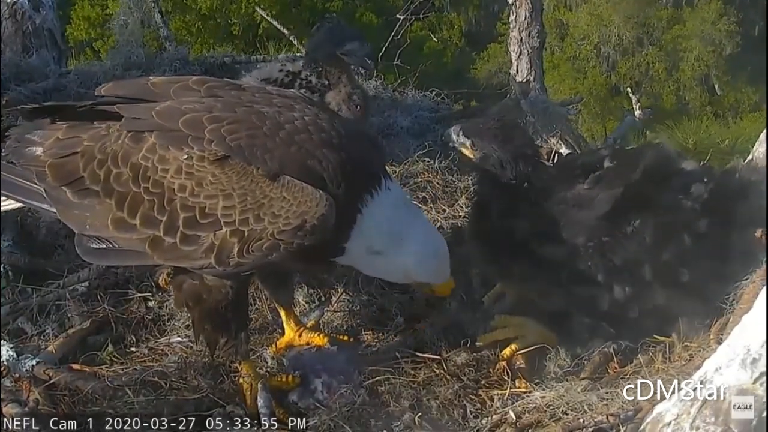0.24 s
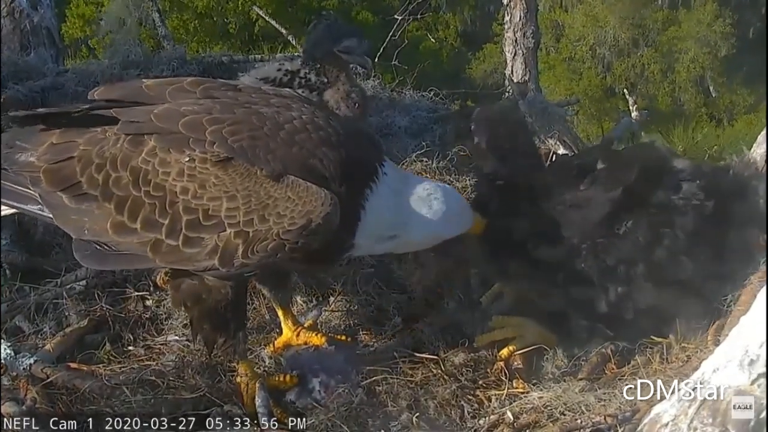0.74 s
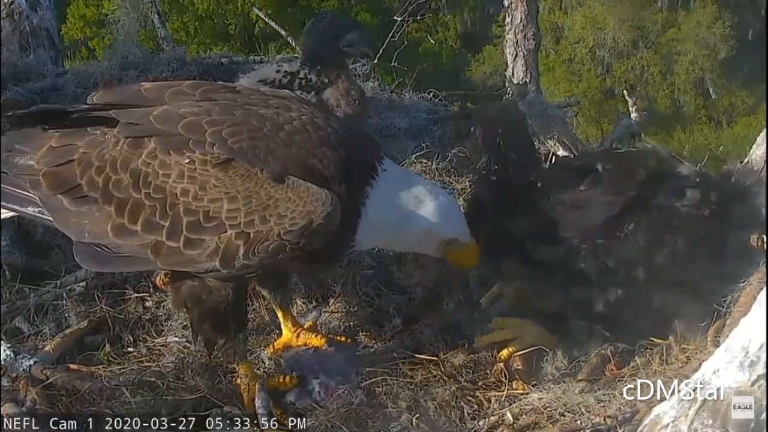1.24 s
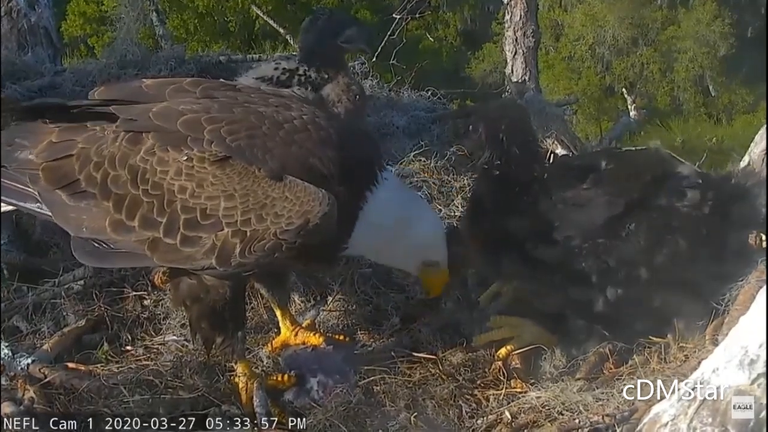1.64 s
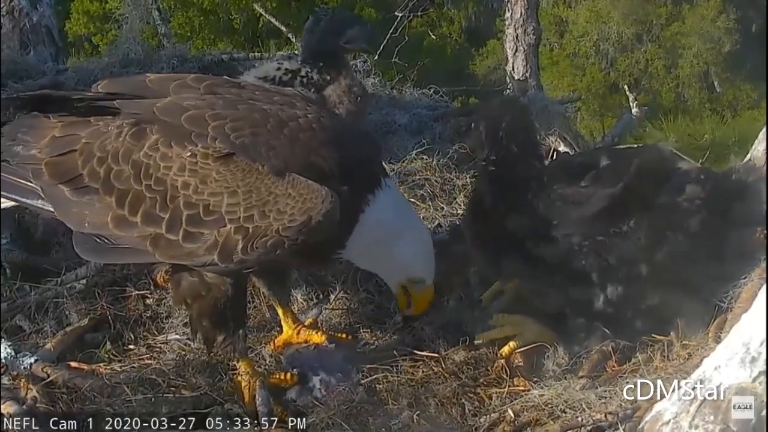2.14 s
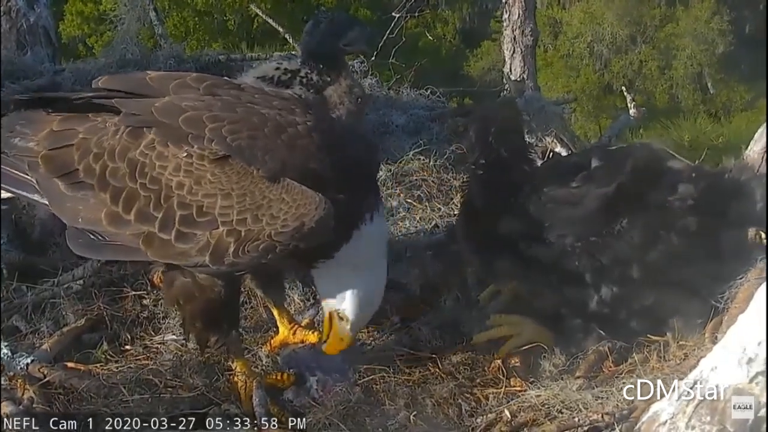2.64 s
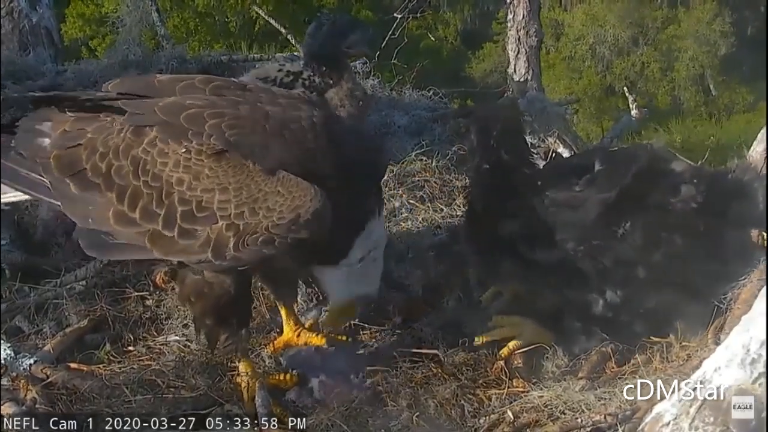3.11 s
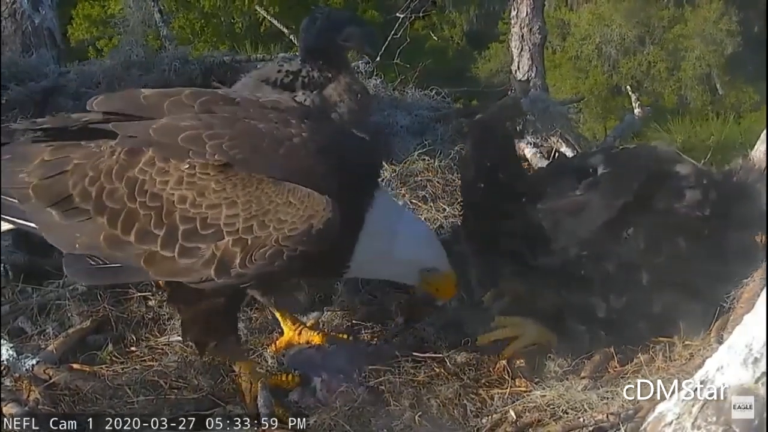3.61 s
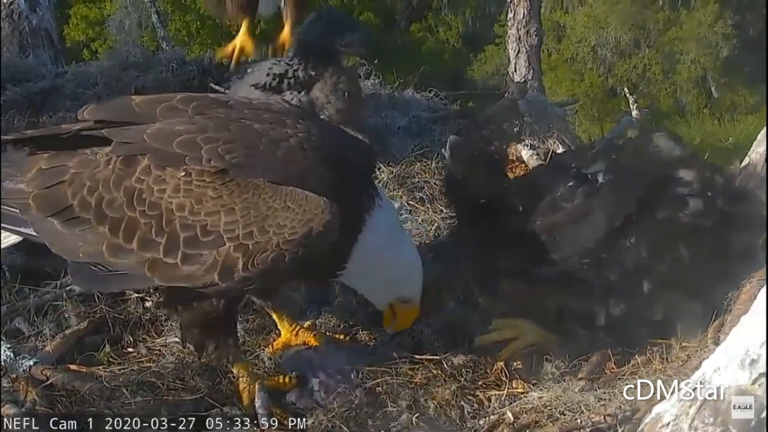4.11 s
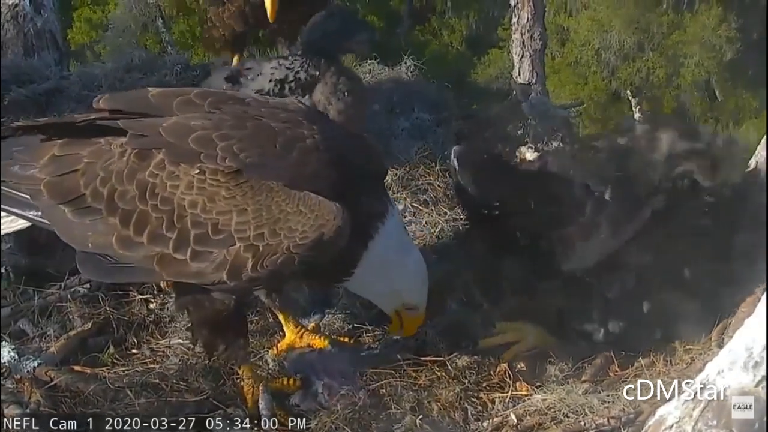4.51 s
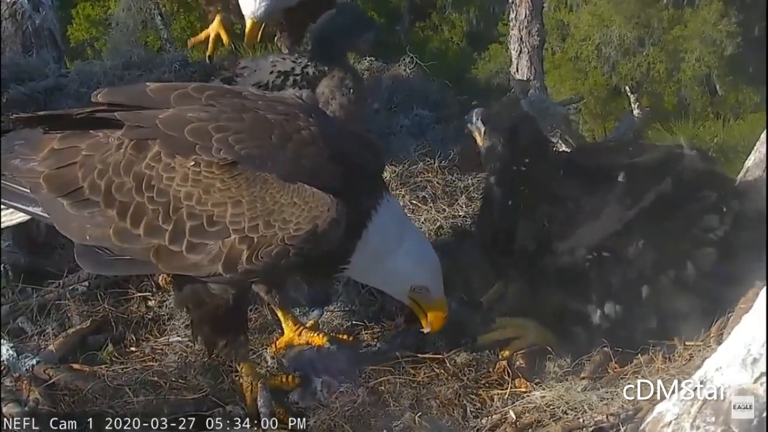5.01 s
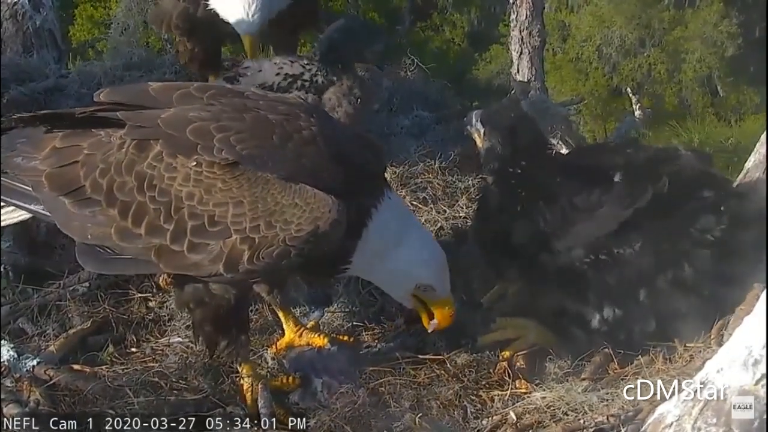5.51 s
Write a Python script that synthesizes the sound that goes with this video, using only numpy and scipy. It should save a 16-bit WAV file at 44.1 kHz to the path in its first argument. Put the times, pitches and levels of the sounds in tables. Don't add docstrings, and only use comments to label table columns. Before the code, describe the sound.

An eagle close by gives loud, piercing, wavering thin whistles that turn hoarse, then soft chirps, while another answers faintly over leaf hiss and wind.

```python
import sys
import numpy as np
from scipy import signal
from scipy.fft import rfft, irfft, next_fast_len
from scipy.io import wavfile
from scipy.ndimage import uniform_filter1d

SR = 44100
rng = np.random.default_rng(int(sys.argv[2]) if len(sys.argv) > 2 else 0)


def gain_from_db(level_db):
    decades = np.asarray(level_db, float) / 20
    return 10 ** decades


def wrap_up_sound(samples):
    columns = np.atleast_2d(samples).T
    tamed = np.clip(columns, -1, 1)
    steps = np.round(tamed * 32767).astype(np.int16)
    wavfile.write(sys.argv[1], SR, steps)


N = 253553
T = np.arange(N) / SR

# time in seconds, pitch in Hz, level in dB.
NEAR_PHRASES = [
    [(0.0, 3211, -21), (0.226, 3255, -22), (0.28, 3177, -20.5), (0.29, 2787, -20), (0.3, 2808, -35)],
    [(0.308, 2659, -20.5), (0.314, 2576, -14), (0.322, 2460, -16.5), (0.348, 2411, -32.5),
     (0.36, 2620, -46)],
    [(1.17, 3355, -31.5), (1.274, 3418, -21.5), (1.31, 3393, -29.5), (1.352, 3443, -23),
     (1.488, 3430, -24.5)],
]
# time in seconds, pitch in Hz, level in dB.
SOFT_PHRASES = [
    [(2.97, 3440, -48), (2.998, 3596, -38), (3.016, 3160, -36), (3.068, 2830, -38), (3.09, 2796, -42),
     (3.1, 3017, -66)],
    [(4.95, 2938, -40), (4.964, 2762, -34.5), (5.066, 2789, -40), (5.092, 2906, -33), (5.17, 2891, -33),
     (5.2, 2823, -45)],
    [(5.2, 2797, -48.5), (5.212, 2970, -41.5), (5.282, 2886, -33.5), (5.314, 2923, -38), (5.34, 2990, -37),
     (5.4, 2900, -39)],
    [(5.41, 2833, -34), (5.418, 2587, -28), (5.426, 2580, -24), (5.432, 2430, -38), (5.44, 2180, -43)],
]
# time in seconds, pitch in Hz, level in dB.
HUSKY_PHRASES = [
    [(0.71, 2513, -59), (0.726, 3098, -31), (0.76, 3496, -30), (0.846, 2934, -30), (0.91, 3040, -31),
     (0.944, 3032, -34), (1.022, 3280, -20), (1.034, 3318, -30), (1.17, 3340, -29.5)],
]
# trough in seconds, trough pitch in Hz, crest in seconds, crest pitch in Hz, level in dB.
HOARSE_SYLLABLES = [(1.745, 3450, 1.775, 3660, -23.5), (1.825, 3110, 1.895, 3550, -21.5),
                    (1.975, 3250, 2.045, 3490, -22), (2.088, 3110, 2.155, 3360, -23),
                    (2.19, 3270, 2.225, 3300, -20.5), (2.285, 3090, 2.34, 3370, -22.5),
                    (2.36, 3330, 2.39, 3385, -21.5), (2.418, 3170, 2.465, 3350, -27),
                    (2.5, 3290, 2.535, 3500, -28)]
# trough in seconds, trough pitch in Hz,
# crest in seconds, crest pitch in Hz, level in dB.
WAVER_SYLLABLES = [(3.105, 2870, 3.165, 2990, -35), (3.3, 2840, 3.375, 3020, -33),
                   (3.447, 2830, 3.52, 2940, -32), (3.6, 2865, 3.68, 2920, -34),
                   (3.73, 2740, 3.8, 2800, -38), (3.846, 2790, 3.866, 2610, -31)]
# trough in seconds, trough pitch in Hz,
# crest in seconds, crest pitch in Hz, level in dB.
REPLY_SYLLABLES = [(3.325, 3790, 3.38, 3960, -43), (3.46, 3790, 3.54, 3900, -43),
                   (3.605, 3820, 3.66, 3940, -45)]
# start in seconds, length in seconds, crest pitch in Hz, arch in Hz, level in dB.
CHIRPS = [(4.09, 0.1, 3180, 380, -31.5), (4.25, .11, 2990, 380, -30), (4.4, 0.11, 2920, 420, -35),
          (4.74, .115, 2936, 420, -35), (4.875, .1, 2884, 329.5, -34.5)]
# start in seconds, length in seconds, pitch in Hz, sag in Hz, level in dB.
FAR_NOTES = [(1.41, .09, 4010, 29.5, -42), (2.63, .08, 3850, -21, -38.5), (2.71, .07, 3830, 81, -41.5),
             (4.275, .065, 4050, 29.5, -45), (4.435, .07, 3990, 40, -44.5), (4.52, 0.11, 3960, 1.5, -51.5),
             (5.575, .065, 4130, 25, -44.5), (5.645, .1, 3940, 99, -53)]
# start in seconds, length in seconds, pitch in Hz, sag in Hz, level in dB.
UNDER_NOTES = [(1.21, 0.094, 3080, 0.5, -39), (1.33, 0.22, 3094, 0.5, -36), (1.8, 0.065, 3015, -1.5, -35.5),
               (1.97, .07, 3063, -1.5, -30), (2.17, .1, 2980, 59.5, -36.5), (2.33, .13, 2954, -0.5, -35.5)]
# start in seconds, peak in dB.
PUSHES = [(0.079, -10.5), (.1114, -13), (0.2125, -7.5), (.262, -17), (.3107, -12), (.4444, -27),
          (0.781, -20), (.962, -15), (1.0071, -13), (1.2452, -12.5), (1.3507, -14.5), (1.481, -16.5),
          (2.178, -14), (1.94, -16.5), (1.8192, -19), (1.8623, -9.5), (1.974, -15.5), (2.0272, -12.5),
          (2.052, -9.5), (2.095, -11), (2.2247, -15), (2.367, -14), (2.4816, -17), (3.3266, -25),
          (3.489, -21.5), (3.6172, -23.5), (3.8493, -19), (4.7569, -22.5), (5.2615, -22), (5.376, -21),
          (5.391, -23), (5.418, -22)]
# time in seconds, depth in dB.
CATCHES = [(1.305, -8.5), (1.462, -9), (1.848, -9.5), (1.955, -5), (3.21, -7), (3.322, -8), (3.35, -5),
           (3.452, -13), (3.6, -4), (3.843, -13), (4.125, -4), (4.435, -7), (4.752, -8), (5.368, -8),
           (5.408, -11)]
OVERTONES_DB = [-45.5, -45.5, -48]
# frequency in Hz, density in dB per Hz.
BREATH = [(1500, -39), (2200, -22.5), (2600, -7), (3200, 1), (3900, -5.5), (4400, -18), (6000, -55)]
# start in seconds, length in seconds, pitch in Hz, fall as a share of pitch, level in dB.
GULPS = [
    (.308, 0.069, 1306, .1, -29),
    (1.489, 0.013, 1440, 0.12, -26),
    (1.502, 0.03, 1986, 0.055, -26),
    (1.516, 0.029, 1895, .07, -28),
    (1.519, 0.059, 1152, 0.047, -40),
    (2.361, 0.11, 313, .033, -56),
    (3.904, 0.027, 1170, 0.085, -37),
    (5.428, 0.039, 1182, .03, -31.5),
]
# frequency in Hz, gain in dB.
THROAT = [(316, 0.5), (630, -11), (1150, -23.5), (2000, -5), (2900, 7), (3900, -6.5), (4400, -9),
          (6000, -25)]
# start in seconds, length in seconds, level in dB.
RUSTLES = [(9.3, .025, -46), (5.02, 0.063, -50.5), (3.47, 0.039, -58)]
# frequency in Hz, density in dB per Hz.
LEAVES = [(120, -55), (200, -32), (281, -28), (440, -28), (499, -24.5), (1850, -14), (2130, -12.5),
          (2600, 0.5), (2790, -1.5), (3930, -8), (5520, -26.5), (13100, -46), (14600, -60)]
# centre in seconds, half width in seconds, level in dB over the breeze.
GUSTS = [(.07, .03, 3.5), (.29, 0.1, 13.5), (.7, .06, 8.5), (1.02, 0.11, 6.5), (1.36, 0.082, 6),
         (1.699, 0.077, -9.5), (1.88, 0.14, 7), (2.149, .15, 1.5), (2.53, .05, 7.5), (2.801, 0.2, -12),
         (3.461, 0.078, 11), (4.1, .25, 0.5), (4.63, 0.12, -14), (4.8, 0.019, 11), (5.02, 0.067, 13),
         (5.421, 0.06, 10.5), (5.75, .1, -10)]
# frame number, level in dB over the 1-2 kHz hiss that a band needs to survive.
STARVED = [(6, 7), (14, 3), (26, 2), (32, 1), (35, 3), (36, 6), (45, 1), (49, 1), (52, 6), (103, 8),
           (109, 7), (112, 4), (113, 7), (119, 1), (123, 2), (126, 3), (127, 3), (134, 0), (138, -1),
           (150, 5), (155, 2), (170, 0), (174, 4), (185, 4), (197, 2), (234, 3), (245, 1), (249, 2),
           (252, 3), (254, 4)]


def near_bird():
    push = pushes(rise_s=0.008, fall_s=0.014, trim_db=-4.5)
    hoarse = warble(HOARSE_SYLLABLES, end=(2.59, 2650, -32.5))
    waver = warble(WAVER_SYLLABLES, end=(3.9, 2580, -34.5))
    soft = SOFT_PHRASES[:1] + waver + SOFT_PHRASES[1:]
    voice = whistle(NEAR_PHRASES, push, flutter_db=1.6, rasp=0.27, rasp_rate=450,
                    side_hz=470, side_db=-19, jitter=0.004, breath_db=-16)
    voice += whistle(HUSKY_PHRASES, push, flutter_db=1.6, rasp=0.28, rasp_rate=500,
                     side_hz=190, side_db=-12, jitter=0.006, breath_db=-14)
    voice += whistle(hoarse, push, flutter_db=1.7, rasp=0.36, rasp_rate=750,
                     side_hz=330, side_db=-10, jitter=0.01, breath_db=-12)
    voice += whistle(soft, push, flutter_db=2.6, rasp=0.18, rasp_rate=450,
                     side_hz=200, side_db=-17, jitter=0.005, breath_db=-18)
    voice += whistle(held(UNDER_NOTES), 0, flutter_db=5.0, rasp=0.08, rasp_rate=700,
                     side_hz=202, side_db=-18, jitter=0.0043, breath_db=-25.5)
    voice += whistle(chirps(CHIRPS), push, flutter_db=3, rasp=0.3, rasp_rate=450,
                     side_hz=70, side_db=-7, jitter=0.005, breath_db=-18)
    return voice


def far_bird():
    notes = held(FAR_NOTES)
    reply = warble(REPLY_SYLLABLES, end=(3.8, 3770, -54))
    return whistle(notes[:3] + reply + notes[3:], 0, flutter_db=2.2, rasp=0.18, rasp_rate=400,
                   side_hz=200, side_db=-21, jitter=0.005, breath_db=-22)


def whistle(phrases, push, flutter_db, rasp, rasp_rate, side_hz, side_db, jitter, breath_db):
    hz, gain = played(phrases)
    sounding = np.clip(gain / gain_from_db(-60.0), 0, 1)
    gain = np.maximum(gain * gain_from_db(flutter_db * walk(70)), push * sounding)
    phase = 2 * np.pi * np.cumsum(hz * (1 + jitter * walk(90.2))) / SR
    twin_phase = 2 * np.pi * np.cumsum(side_hz * (1 + 0.13 * walk(12))) / SR
    twin = gain_from_db(side_db + 8.0 * walk(11)) * np.sin(twin_phase)
    shake = 1 + twin + rasp * (walk(rasp_rate) + 1j * walk(rasp_rate))
    size = np.sqrt(2) * gain * abs(shake) / np.sqrt(np.mean(abs(shake) ** 2))
    phase = phase + np.angle(shake)
    grain = 0.32 * walk(700)
    full_effort_db = -20
    effort = (size / gain_from_db(full_effort_db)) ** 0.29
    overtones = sum(gain_from_db(db) * np.sin((k + 2) * (phase + grain)) for k, db in enumerate(OVERTONES_DB))
    breath = gain * gain_from_db(breath_db) * colour(BREATH)
    return size * (np.sin(phase) + effort * overtones) + breath


def played(phrases):
    hz = np.interp(T, *np.concatenate(phrases)[:, :2].T)
    gain = np.zeros(N)
    for s, _, db in map(np.transpose, phrases):
        on = (T >= s[0]) & (T <= s[-1])
        gain[on] = gain_from_db(np.interp(T[on], s, db))
    return uniform_filter1d(hz, 150), uniform_filter1d(gain, 200)


def warble(rows, end):
    trough_db = -4.5
    turns = []
    for s, hz, top_s, top_hz, db in rows:
        turns += [(s, hz, db + trough_db), (top_s, top_hz, db)]
    turns = np.array(turns + [end])
    ease = np.linspace(0, 1, num=8, endpoint=False)[:, None]
    swing = (1 - np.cos(np.pi * ease)) / 2
    shape = np.hstack([ease, swing, swing])
    return [np.concatenate([a + (b - a) * shape for a, b in zip(turns, turns[1:])] + [turns[-1:]])]


def chirps(rows):
    u = np.linspace(-1, 1, num=15)
    edge_db = -13
    return [np.transpose([s + length * (u + 1) / 2, hz - arch_hz * u ** 2, db + edge_db * u ** 2])
            for s, length, hz, arch_hz, db in rows]


def held(rows):
    fade_s, edge_db, tire_db = 0.015, -3.5, -3
    return [[(s, hz, db + edge_db),
             (s + fade_s, hz, db),
             (s + length - fade_s, hz - sag_hz, db + tire_db),
             (s + length, hz - sag_hz, db + tire_db + edge_db)] for s, length, hz, sag_hz, db in rows]


def pushes(rise_s, fall_s, trim_db):
    out = np.zeros(N)
    for s, db in PUSHES:
        span = slice(int(s * SR), int((s + 0.06) * SR))
        u = T[span] - s
        rise = np.sin(np.pi / 2 * np.clip(u / rise_s, 0, 1))
        swell = gain_from_db(db + trim_db) * rise * np.exp(-(u / fall_s) ** 2)
        out[span] = np.maximum(out[span], swell)
    return out


def catches():
    width_s = 0.0056
    return gain_from_db(sum(db * np.exp(-((T - s) / width_s) ** 2) for s, db in CATCHES))


def gulps():
    out = np.zeros(N)
    rasp = 1 + 0.55 * walk(350)
    throat_hz, throat_db = np.transpose(THROAT)
    for s, length, hz, fall, db in GULPS:
        u = np.clip((T - s) / length, 0, 1)
        phase = 2 * np.pi * hz * length * (u - fall * u ** 2 / 2)
        swell = np.sin(np.pi * u ** 0.37)
        for k in range(1, 4):
            partial_db = db + np.interp(np.log(k * hz), np.log(throat_hz), throat_db)
            out += swell * gain_from_db(partial_db) * np.sin(k * phase)
    return np.sqrt(2) * out * rasp


def wood(x):
    t60_s, tail_db, slap_s, slap_db = 1, -15, 0.125, -18
    t = T[:SR]
    tail = rng.standard_normal(SR) * np.exp(-np.log(1000) * t / t60_s) * np.clip(t / 0.033, 0, 1)
    tail = gain_from_db(tail_db) * tail / np.sqrt(np.sum(tail ** 2))
    tail[int(slap_s * SR)] += gain_from_db(slap_db)
    tail = signal.sosfilt(signal.butter(2, [2000, 5000], "band", fs=SR, output="sos"), tail)
    sway = (1 + 1.6 * walk(260)) / 1.89
    return signal.fftconvolve(x * sway, tail)[:N]


def rustles():
    swell = sum(gain_from_db(db) * np.sin(np.pi * np.clip((T - s) / length, 0, 1)) for s, length, db in RUSTLES)
    twigs = colour([(100, -12), (300, -1), (800, -6.5), (1500, -11.0), (2500, -25)])
    return swell * gain_from_db(3.6 * walk(150)) * twigs


def leaves():
    return gain_from_db(-41.5 + 0.5 * walk(6)) * colour(LEAVES)


def wind():
    calm_db, rumble_db, rumble_slope = -56, -7, 0.79
    gust_db = sum(db * np.exp(-((T - s) / half_s) ** 2) for s, half_s, db in GUSTS)
    low = colour([(12, -32.5), (30, 0), (70, 0.5), (130, -6.5), (200, -13.5), (300, -41)])
    low = low * gain_from_db(2.5 * walk(9))
    high = colour([(150, -6.5), (250, -8), (500, -12.0), (1000, -12), (1900, -13.5)])
    high = high * gain_from_db(3.7 * walk(19))
    return gain_from_db(calm_db) * (gain_from_db(gust_db) * low + gain_from_db(rumble_db + rumble_slope * gust_db) * high)


def colour(points):
    hz, db = np.transpose(points)
    size = next_fast_len(N)
    bins = np.maximum(np.fft.rfftfreq(size, 1 / SR), 1)
    curve_db = np.interp(np.log(bins), np.log(hz), db, left=-90, right=-90)
    y = irfft(rfft(rng.standard_normal(size)) * gain_from_db(curve_db), size)[:N]
    return y / np.std(y)


def walk(rate):
    k = int(SR / rate)
    y = uniform_filter1d(uniform_filter1d(rng.standard_normal(N), k), k)
    return y / np.std(y)


def scene():
    birds = (near_bird() + far_bird()) * catches() + gulps()
    return (birds + wood(birds) + leaves() + wind() + rustles())[None]


def input_stage(x):
    clip, hardness = 0.19, 28
    x = x / clip
    x = x / (1 + abs(x) ** hardness) ** (1 / hardness)
    bend = gain_from_db(-25) * x ** 2 + gain_from_db(-20.5) * (x ** 4 - x ** 2)
    x = clip * (x + bend - uniform_filter1d(bend, 400))
    x = signal.sosfilt(signal.butter(1, 9000, fs=SR, output="sos"), x)
    return signal.sosfilt(signal.ellip(8, 0.2, 60, 14150, fs=SR, output="sos"), x)


def starve(x):
    frame_s, luck_db = 1024 / 48000, 4
    out = x.copy()
    size = int(1.5 * frame_s * SR)
    window = np.sqrt(np.hanning(size))
    luck = rng.standard_normal((len(STARVED), size // 12 + 1))
    for (frame, need_db), chance in zip(STARVED, luck):
        start = int((frame * frame_s + 0.00068) * SR) - size // 2
        spec = rfft(x[start:start + size] * window)
        band = np.sqrt(uniform_filter1d(abs(spec) ** 2, size=5))
        hiss = np.median(band[1000 * size // SR:2000 * size // SR])
        need = hiss * gain_from_db(need_db + luck_db * np.repeat(chance, repeats=6)[:len(spec)])
        lost = spec / (1 + (band / need) ** 8)
        out[start:start + size] -= irfft(lost, size) * window
    return out


def band_limit(x):
    return signal.sosfilt(signal.butter(12, 14700, fs=SR, output="sos"), x)


def record(dry):
    mix = starve(input_stage(dry[0]))[None]
    return band_limit(mix)


dry = scene()
out = record(dry)
wrap_up_sound(out)
```